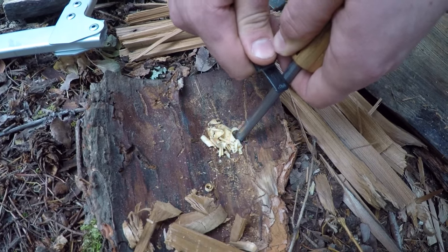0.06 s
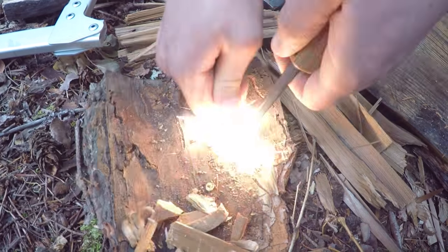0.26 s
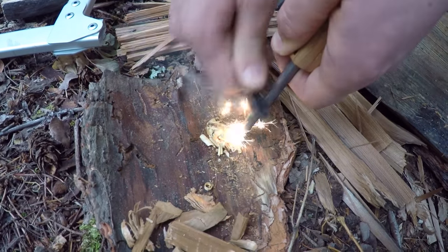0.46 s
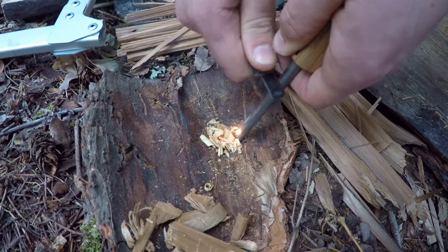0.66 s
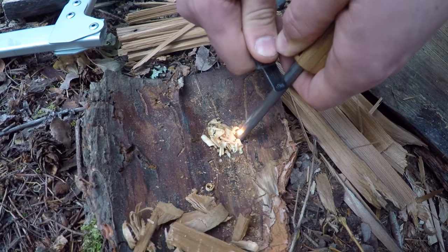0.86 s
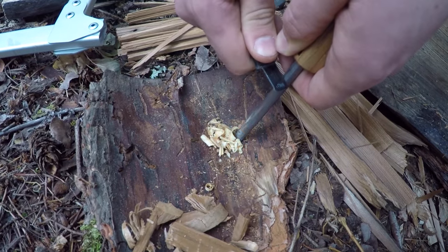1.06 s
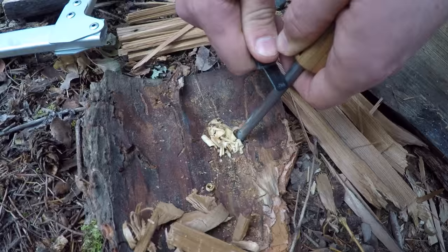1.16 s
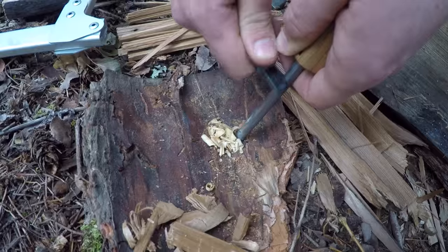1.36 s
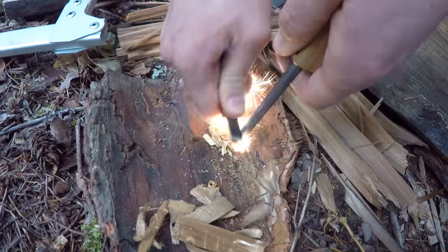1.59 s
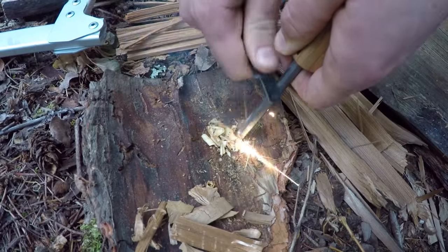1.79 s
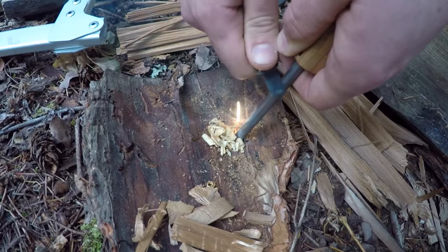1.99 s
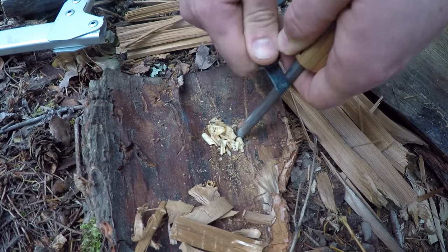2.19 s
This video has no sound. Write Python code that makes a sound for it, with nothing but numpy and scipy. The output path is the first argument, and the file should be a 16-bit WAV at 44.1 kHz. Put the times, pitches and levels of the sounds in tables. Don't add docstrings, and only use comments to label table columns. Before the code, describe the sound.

A striker scrapes harshly down a fire steel, thumping the bark and releasing a burst of crackling sparks; stray pops follow, then a second stroke does the same. Very close microphone, slightly clipped, quiet breezy woods behind.

```python
import sys
import numpy as np
from scipy import signal
from scipy.fft import rfft, irfft, next_fast_len
from scipy.io import wavfile
from scipy.ndimage import uniform_filter1d, map_coordinates

SR = 44100
rng = np.random.default_rng(int(sys.argv[2]) if len(sys.argv) > 2 else 0)


def rack_gain(trim_db):
    fader = np.asarray(trim_db, float)
    return 10 ** (fader / 20)


def file_out(sig):
    cols = np.atleast_2d(sig).T
    lim = np.clip(cols, -1, 1)
    pcm = np.round(lim * 32767).astype(np.int16)
    wavfile.write(sys.argv[1], SR, pcm)


N = 98828
T = np.arange(N) / SR


def unit(x):
    return x / np.sqrt(np.mean(x ** 2) + 1e-20)


def noise():
    return rng.standard_normal(N)


def curve(rows, column=1, outside=-120):
    rows = np.array(rows)
    return np.interp(T, rows[:, 0], rows[:, column], left=outside, right=outside)


def force(tables):
    return np.max([curve(rows) for rows in tables], axis=0)


def wobble(rate):
    knots = rng.standard_normal(int(N * rate / SR) + 4)
    return map_coordinates(knots, [T * rate])


def filtered(x, response):
    m = 2 * next_fast_len(N // 2 + 4096)
    return irfft(rfft(x, m) * response(np.fft.rfftfreq(m, 1 / SR)), m)[:N]


def treble(x, corner_hz):
    return filtered(x, lambda hz: 1 / (1 + (corner_hz / (hz + 1)) ** 6))


def coloured(x, points):
    f, db = np.transpose(points)

    def causal(hz):
        ceps = irfft(np.log(rack_gain(np.interp(np.log(hz + 1), np.log(f), db))))
        half = len(ceps) // 2
        fold = np.r_[1, np.full(half - 1, 2), 1, np.zeros(half - 1)]
        return np.exp(rfft(ceps * fold))
    return unit(filtered(x, causal))


def resonant(x, peaks):
    def response(f):
        total = 0
        for k, (centre, width, db) in enumerate(peaks):
            damping = 1j * f * width
            total = total + (-1) ** k * rack_gain(db) * damping / (centre ** 2 - f ** 2 + damping)
        return total
    return unit(filtered(x, response))


def grains(rate, spread_db):
    when, size = rng.random((2, N))
    kick = rack_gain(-spread_db * np.clip(np.log(size + 1e-9), -3, 0))
    return unit((when < rate / SR) * kick)


def patchy(x, depth_db):
    z = signal.stft(x, nperseg=256)[2]
    field = uniform_filter1d(rng.standard_normal(z.shape), size=7, axis=0)
    field = uniform_filter1d(field, size=5, axis=1)
    return unit(signal.istft(z * rack_gain(depth_db * unit(field)), nperseg=256)[1][:N])


# f/Hz, width/Hz, level/dB
HUM = [(2300, 270, 4), (4060, 320, -1)]


def far_hum():
    return rack_gain(-60.5) * resonant(noise(), HUM)


# f/Hz, level/dB per Hz
LEAVES = [(300, 0.5), (450, -5), (1000, -6), (1800, -7.5), (2250, -9), (2800, -14), (4200, -12),
          (15500, -22.5)]


def far_leaves():
    return rack_gain(-52 + wobble(6.0)) * coloured(noise(), [(150, -49.5)] + LEAVES)


# t/s, level/dB
GUSTS = [
    (0, -45),
    (.3, -36),
    (.6, -40.5),
    (1.3, -47.5),
    (1.6, -33.5),
    (1.9, -44.5),
    (2.24, -42.5),
]
# f/Hz, level/dB per Hz
RUMBLE = [(12, -13), (20, 5.5), (108, -3.5), (170, -8.5), (230, -15), (338, -23.5), (500, -21.5),
          (650, -48), (1100, -120)]


def wind():
    rumble = unit(rack_gain(1.5 * wobble(14.5)) * coloured(noise(), [(14, -58)] + RUMBLE))
    return rack_gain(curve(GUSTS, outside=-38) + 4.0) * rumble


# t/s, level/dB
EMBERS = [
    (0, -68),
    (.58, -58),
    (.64, -54),
    (1.0, -58),
    (1.35, -64),
    (1.8, -39.5),
    (1.86, -52.5),
    (2.24, -60),
]


def embers():
    level = rack_gain(curve(EMBERS, outside=-59) + 1.8 * wobble(40.6))
    return level * coloured(noise() + 1.1 * grains(950, 4), [(40, -55)] + SPARK)


# t/s, peak level/dB, f/Hz (negative = pushed the other way first)
JOLTS = [
    (.029, -27, 70),
    (.1085, -27, -105),
    (1.525, -7, 330),
    (.264, -14, 150),
]


def jolts():
    out = np.zeros(N)
    for s, db, hz in JOLTS:
        turn = np.clip((T - s) * abs(hz) + 1, 0, 2)
        swing = np.sin(2 * np.pi * turn) * np.sin(np.pi * turn / 2) ** 2
        out += 1.4 * rack_gain(db) * np.sign(hz) * swing
    return out


# t/s, level/dB
BITES = [
    (1.424, -12),
    (.1975, -17),
]


def bites():
    out, ring_s, rise_s = np.zeros(N), .03, .002
    for s, db in BITES:
        t = np.clip(T - s, 0, 1)
        level = rack_gain(db - 60 * t / ring_s + 5 * wobble(900)) * np.minimum(t / rise_s, 1)
        out += level * (np.sin(2 * np.pi * 5140 * t) + np.sin(2 * np.pi * 6760 * t) / 2)
    return out


# t/s, f/Hz, level/dB
WHISTLE = [(1.712, 7650, -45), (1.716, 7700, -19), (1.724, 7680, -13), (1.73, 7800, -20),
           (1.737, 7700, -30), (1.745, 7700, -45)]


def whistle():
    hz = curve(WHISTLE, outside=7700) * (1 + .015 * wobble(900))
    phase = 2 * np.pi * np.cumsum(hz) / SR
    db = uniform_filter1d(curve(WHISTLE, column=2), size=60) + 2 * wobble(900)
    return np.sqrt(2) * rack_gain(db) * (np.sin(phase) + rack_gain(-7) * np.sin(2 * phase))


# t/s, peak level/dB, f/Hz
POPS = [(.328, 1, 4000), (.3449, 0, 3600), (.388, -3, 4200), (.3986, 2, 3800), (.4303, -9, 3600),
        (.4546, -6, 3000), (.498, -3, 4800), (.5074, -14, 4000), (.5229, 2, 4000), (.5285, -5, 4400),
        (.5318, -7, 4800), (.5473, -7, 3000), (.5624, -7, 2000), (.5696, 0, 4400), (.5838, -8, 4000),
        (.6673, -8, 4200), (1.4822, -1, 5100), (1.6156, 1, 3700), (1.6197, -1, 4600), (1.682, -7, 3700),
        (1.769, -7, 3400), (1.8036, -13, 5100), (1.8254, -4, 5000), (1.8321, -3.5, 4200),
        (2.0039, -9, 4600), (2.0053, -11, 2500), (2.0152, -5, 3500), (2.0184, -6, 4000), (2.0212, 2, 4200),
        (2.2382, -18, 5800),
        (.2187, -5, 4800), (.2225, -4, 5300), (.2427, 0, 1500), (.2808, 0, 2800), (.3145, 0, 3300),
          (.3214, 0, 3300), (.3401, -4, 4600), (.3469, -1, 3000), (.3528, -5, 4500), (.3639, -5, 4200),
          (.3766, -7, 4400), (.3892, -4, 4200), (.4069, -12, 3500), (.4083, -14, 4900), (.4404, -11, 4100),
          (.4439, -11, 3700), (.4579, -9, 2600), (.4602, -7, 3200), (.4638, -9, 4200), (.4649, -10, 4100),
          (.4841, -15, 4900), (.493, -14, 2700), (.5133, -17, 3600), (.5439, -10, 4700), (.5744, -8, 3800),
          (.5755, -8, 4100), (.5863, -13, 3500), (.6761, -16, 4700), (.8929, -28, 5100), (.8939, -28, 7200),
          (1.406, -20, 3100), (1.4924, -1, 6000), (1.5433, 0, 2800), (1.5644, -1, 3500), (1.5915, -3, 2700),
          (1.5976, 0, 3600), (1.5996, 0, 3600), (1.6027, -3, 3800), (1.6122, -5, 3900), (1.6352, -8, 3600),
          (1.6493, -10, 3000), (1.6735, -14, 5100), (1.6915, -8, 4000), (1.7055, -6, 3800),
          (1.7434, -14, 4800), (1.7459, -15, 3800), (1.7682, -7, 3800), (1.7699, -8, 3400),
          (1.7851, -13, 4400), (1.83, -9, 4700), (1.8834, -29, 3200), (2.0158, -5, 5600),
        (.0813, -37, 3500), (.6157, -22, 2500), (.7017, -25, 5000), (.7363, -30, 3500), (.8678, -30, 5000),
         (1.1802, -38, 1100), (1.229, -39, 2500), (1.3918, -28, 4000), (1.8612, -23, 5000),
         (1.878, -27, 6800), (1.9259, -19, 5500), (1.9283, -26, 5700), (2.0731, -28, 1550),
         (2.2112, -25, 10400)]


def pops():
    scatter_db, scatter_s = -17, .01
    out, t = np.zeros(N + SR), np.arange(SR // 30) / SR
    for s, db, hz in POPS:
        turn = np.sin(2 * np.pi * hz * t) * (t * hz < 1)
        snap = np.sign(turn) * np.abs(turn) ** 2.2
        ground = rng.standard_normal(len(t)) * rack_gain(-60 * t / scatter_s)
        scatter = np.convolve(snap, ground)[:len(t)] / np.linalg.norm(snap)
        start = round((s - .5 / hz) * SR)
        out[start:][:len(t)] += rack_gain(db) * (snap + rack_gain(scatter_db) * np.roll(scatter, 8))
    return out[:N]


# f/Hz, level/dB per Hz
SPARK = [(250, -10.5), (750, -16), (1050, -3), (2500, -6.5), (3300, 1.5), (6500, -6), (8500, -12),
         (15500, -14)]
# f/Hz, width/Hz, level/dB
BARK = [(1320, 250, -5), (3350, 450, 0), (4300, 500, -3)]


def crackle(bark_share, spread_db):
    blunt_hz, clump_db = 11000, 2.6
    cracks = filtered(grains(3000, spread_db), lambda hz: 1 / (1 + 1j * hz / blunt_hz) ** 2)
    raw = unit(cracks) + .4 * noise()
    raw = raw * rack_gain(clump_db * wobble(250) + wobble(70))
    raw = coloured(raw, [(40, -112)] + SPARK)
    return patchy(raw + bark_share * resonant(raw, BARK), 1.67)


# t/s, length/s, level/dB, treble level/dB
SIZZLES = [(0.404, 0.0097, -25.5, 5.5), (0.417, .017, -23, 0), (0.426, 0.041, -25, 6.5),
           (0.47, 0.047, -32.5, 3.5), (0.487, 0.0034, -29, 9), (0.512, 0.0089, -27, 1),
           (0.52, 0.0094, -22, 10.5), (0.53, 0.011, -28, 9.5), (0.541, 0.015, -20, 5),
           (0.559, 0.0059, -18.5, 7), (0.566, 0.021, -22.5, 2), (0.588, 0.029, -34.5, 1.5),
           (0.663, 0.0038, -27.5, 10), (0.67, 0.01, -34, 9), (0.691, .015, -44.5, 4),
           (0.856, 0.0075, -47, 7), (0.89, 0.0074, -46, 15), (1.75, 0.058, -32.5, 0),
           (1.751, 0.0014, -20.5, 4), (1.769, 0.003, -19, 3.5), (1.785, 0.0042, -22.5, 7.5),
           (1.801, 0.0046, -29, -2), (1.82, 0.019, -26, 10.5), (1.843, 0.012, -37.5, 7),
           (1.875, 0.0096, -41, 4), (2.0027, 0.0036, -19, -4), (2.0138, 0.0095, -18.5, 2),
           (2.023, 0.012, -28, 0), (2.033, 0.029, -45.5, 9), (2.066, 0.007, -44.5, 6),
           (2.236, 0.0025, -35, 14)]


def sizzles():
    rise_s, fade_s = .001, .014
    low, high = np.zeros(N), np.zeros(N)
    for s, length, db, treble_db in SIZZLES:
        fade_db = 60 * np.clip(T - s - length, 0, 1) / fade_s
        shape = np.clip((T - s) / rise_s, 0, 1) * rack_gain(db - fade_db)
        low = np.maximum(low, shape)
        high = np.maximum(high, shape * rack_gain(treble_db))
    burn = crackle(.1, 2.5)
    top = treble(burn, 7800)
    return low * (burn - top) + high * top


# t/s, level/dB
SHOWERS = [
    [(.215, -25), (.235, -12.5), (.265, -7), (.289, -9.5), (.311, -8), (.335, -14.5), (.359, -20),
     (.386, -18), (.404, -22.5)],
    [(1.472, -24), (1.49, -19), (1.493, -12), (1.504, -11), (1.513, -4.5), (1.534, -8), (1.546, -12),
     (1.558, -16)],
    [(1.558, -12), (1.565, -9.5), (1.578, -15), (1.586, -16), (1.598, -12.5), (1.608, -23.5), (1.617, -10),
     (1.626, -25)],
    [(1.626, -19), (1.675, -26), (1.69, -17), (1.706, -16.5), (1.716, -19), (1.75, -34.5)],
]


def showers():
    db = uniform_filter1d(force(SHOWERS), size=90)
    bark_share = .35 * rack_gain(np.minimum(db + 9.5, 0))
    return rack_gain(db) * crackle(bark_share, 3)


# f/Hz, level/dB per Hz
THUMP = [(30, -1), (70, 1), (160, 2), (230, -10), (450, -4), (800, -9), (1300, -40)]


def bark_thump():
    flare_db = uniform_filter1d(force(SHOWERS), size=90)
    thump = coloured(noise(), [(21.0, -46)] + THUMP + [(2500, -103.5)])
    push = rack_gain(1.3 * (flare_db + 8) - 23.5) + rack_gain(force(STROKES) - 4.5)
    return push * thump


# t/s, level/dB
STROKES = [
    [(.157, -39), (.162, -29), (.188, -23), (.196, -25), (.212, -28), (.235, -17.5), (.27, -20.5),
     (.29, -52)],
    [(1.388, -53), (1.409, -39.5), (1.412, -27.5), (1.426, -27), (1.44, -27.5), (1.47, -26.5), (1.505, -18),
     (1.53, -28.5), (1.56, -33)],
]
# f/Hz, width/Hz, level/dB
STEEL = [(450, 500, -10), (1150, 700, -8), (2600, 1100, -10), (3900, 650, -3), (5140, 260, 1),
         (6500, 600, -3), (9600, 1400, -4), (13600, 2500, -9)]


def scrape():
    slips = grains(4000, 3) + noise()
    rasp = patchy(resonant(slips, STEEL), 3)
    db = uniform_filter1d(force(STROKES), size=90)
    grip_db = -28
    sheen = treble(rasp, 8000)
    rasp = rasp - sheen + sheen * rack_gain(np.minimum(db - grip_db, 0))
    return rack_gain(db + 5 + 1.6 * wobble(150)) * rasp


def scene():
    strokes = scrape() + bark_thump()
    sparks = showers() + sizzles() + pops() + whistle()
    woods = wind() + far_leaves() + embers() + far_hum()
    knocks = bites() + jolts()
    return (strokes + sparks + woods + knocks)[None]


def top_cut(x):
    return signal.sosfilt(signal.butter(12, 16430, fs=SR, output="sos"), x)


def record(dry):
    top, hardness = .98, 6
    x = filtered(dry[0], lambda hz: 1 / (1 + (hz / 15300) ** 200))
    x = x / (1 + np.abs(x / top) ** hardness) ** (1 / hardness)
    mix = filtered(x, lambda hz: 1 / (1 + (hz / 16050) ** 160))[None]
    return top_cut(mix)


dry = scene()
out = record(dry)
file_out(out)
```